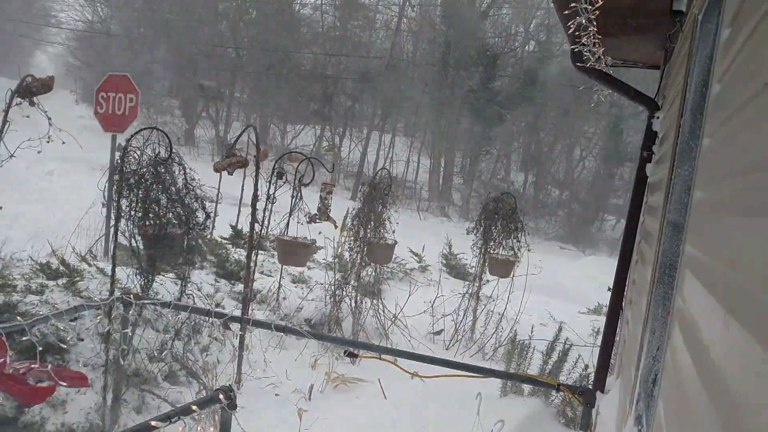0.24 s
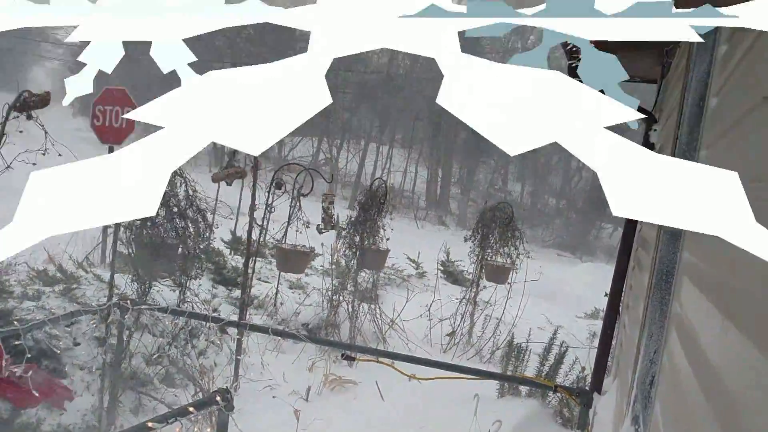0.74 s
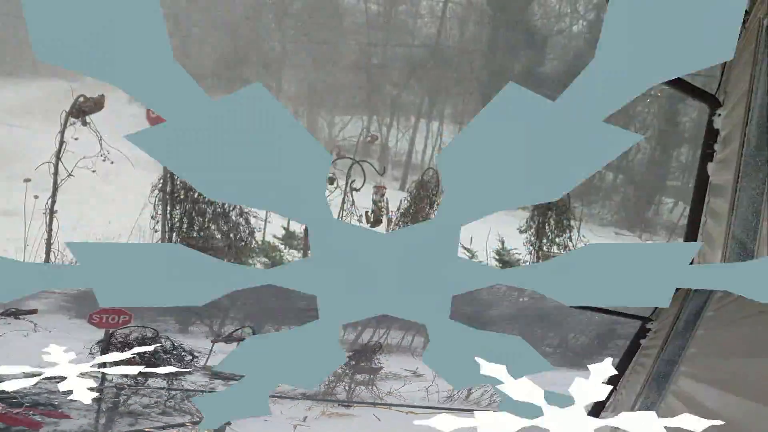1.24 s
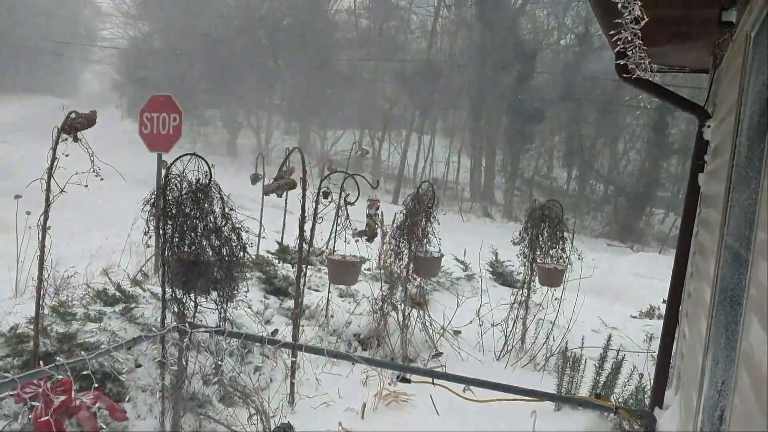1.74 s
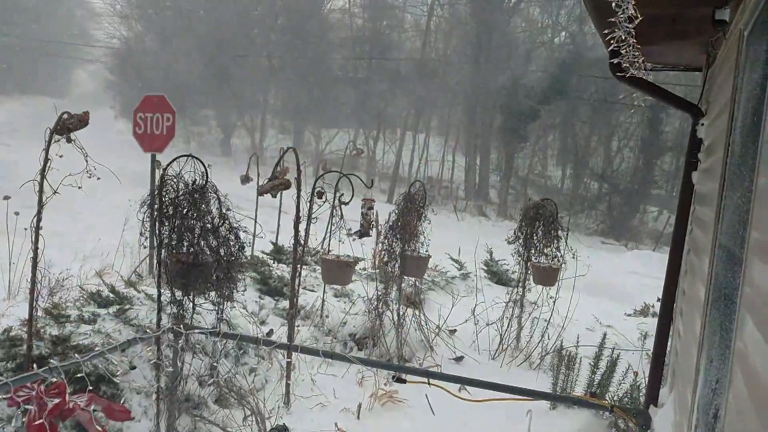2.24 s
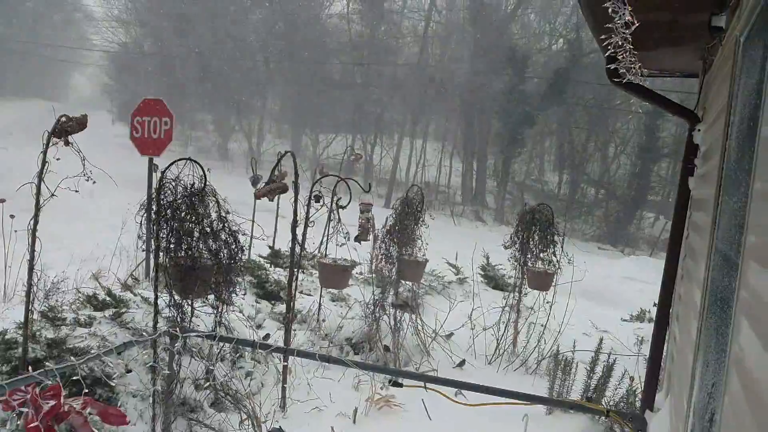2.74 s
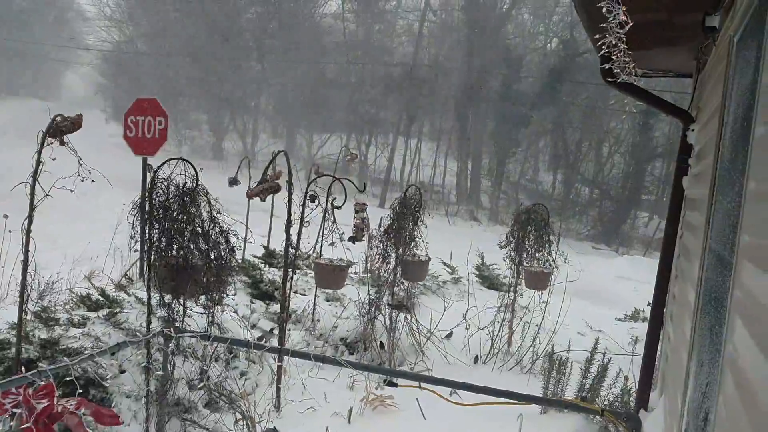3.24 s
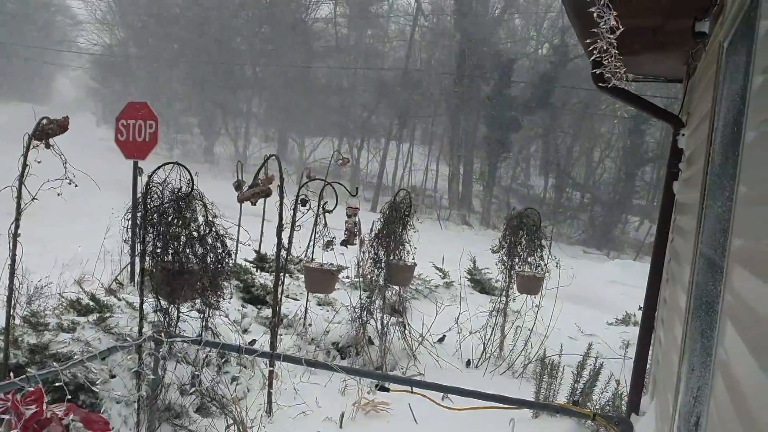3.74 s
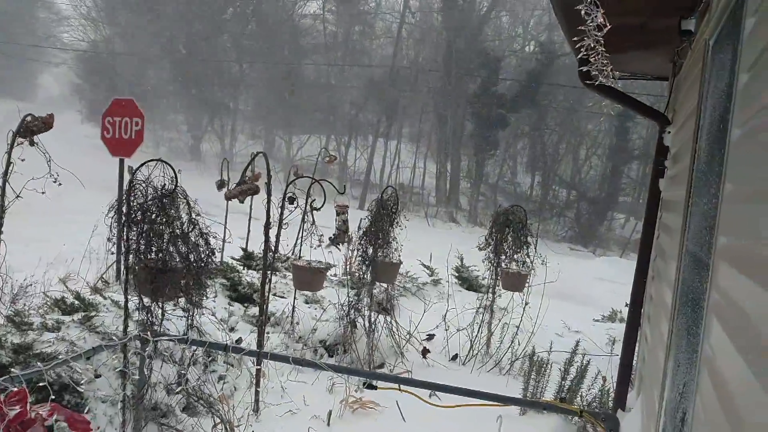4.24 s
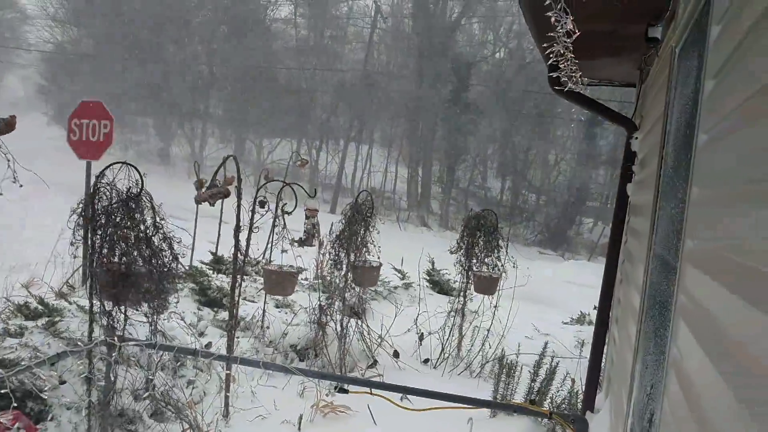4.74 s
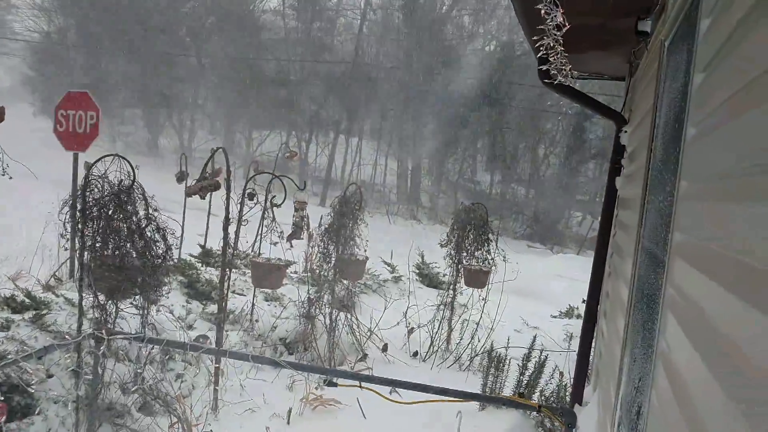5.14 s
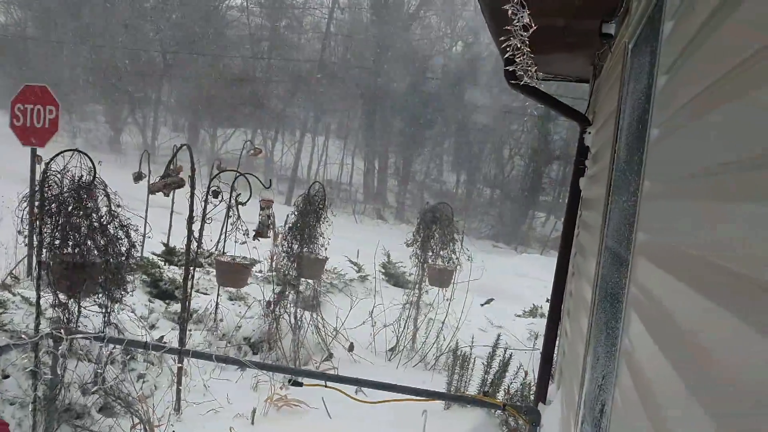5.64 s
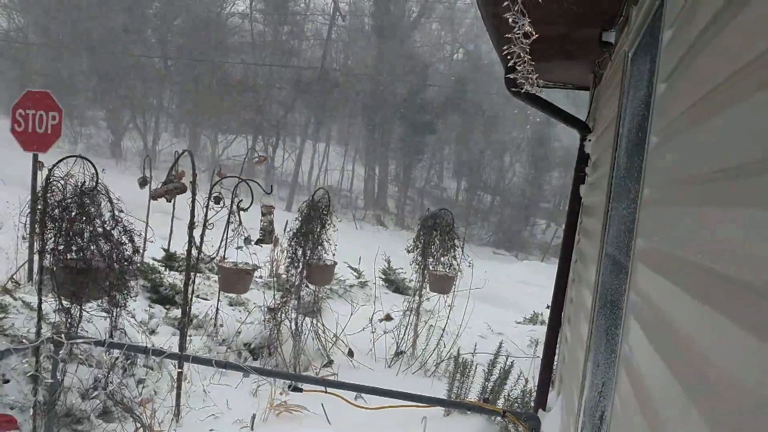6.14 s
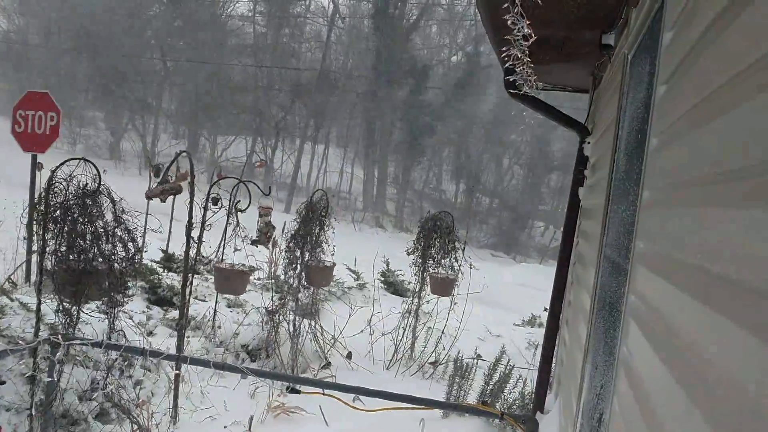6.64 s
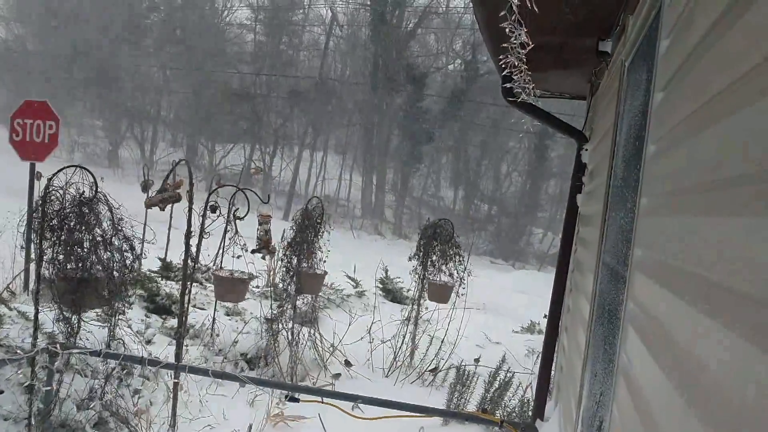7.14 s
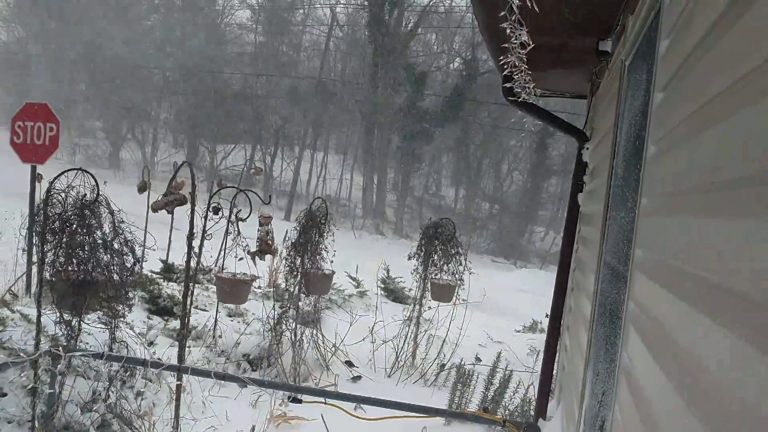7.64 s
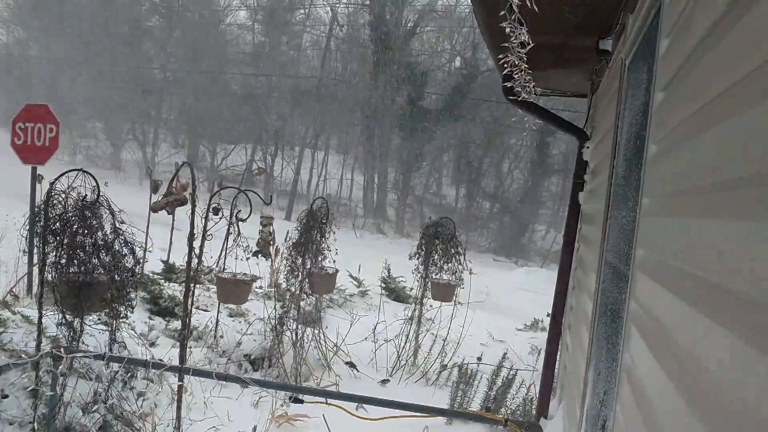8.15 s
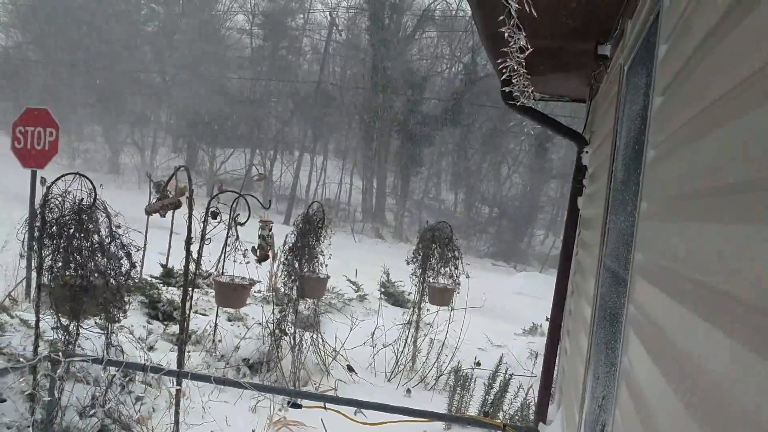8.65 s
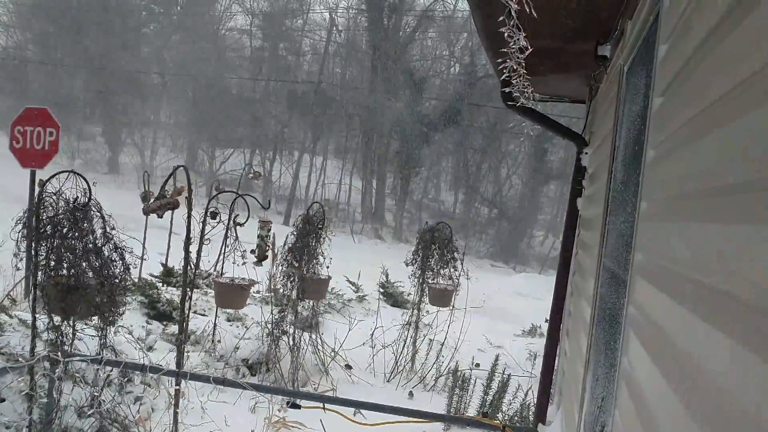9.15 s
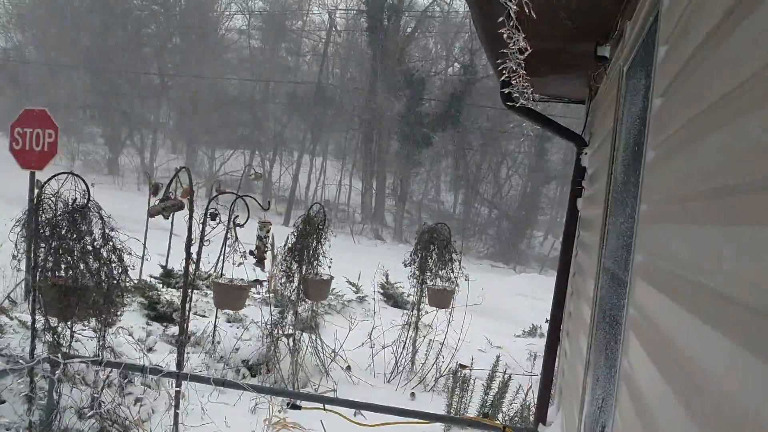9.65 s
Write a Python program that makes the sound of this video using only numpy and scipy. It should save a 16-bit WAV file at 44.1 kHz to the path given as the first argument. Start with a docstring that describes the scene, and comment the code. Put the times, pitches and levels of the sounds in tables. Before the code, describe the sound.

Door seal scrapes, latch rattles and a faint hinge squeak, then loud snowy wind roars outdoors, buffeting and overloading a small camera's microphones.

```python
"""Wind roars in bare trees as a door beside the microphone rubs, its latch clicks and its hinge squeaks.
It is a blizzard in a yard: filtered noise makes the roar and the hiss of blown snow, short pressure swings
make eddies thump on the two microphone ports of a small camera, and air at the left port sizzles and
whistles twice. Noise bursts ring the latch and door panel; shaped noise is the seal, tones are the hinge.
The camera widens its stereo by taking from each port a late copy of the other."""
import sys
import numpy as np
from scipy import signal
from scipy.fft import rfft, irfft, next_fast_len
from scipy.io import wavfile
from scipy.ndimage import uniform_filter1d, map_coordinates

SR = 44100
rng = np.random.default_rng(int(sys.argv[2]) if len(sys.argv) > 2 else 0)


def waveform_to_disk(signal):
    """Save audio, clipped to [-1, 1], as 16-bit WAV at the path in sys.argv[1]."""
    frames = np.transpose(np.atleast_2d(signal))
    scaled = np.clip(frames, -1, 1) * 32767
    samples = np.round(scaled).astype(np.int16)
    wavfile.write(sys.argv[1], SR, samples)


N = 437031
TIME = np.arange(N) / SR  # s


def amp(db):
    """Decibels to gain."""
    return 10 ** (np.asarray(db) / 20)


def unit(x):
    """Scale to rms 1."""
    return x / np.sqrt(np.mean(x ** 2) + 1e-20)


def along(points, hz):
    """Read (Hz, value) points on a log frequency axis."""
    f, v = np.transpose(points)
    return np.interp(np.log(hz + 1), np.log(f + 1), v)


def curve(points):
    """Join (s, value) points by straight lines, one value per sample."""
    s, v = np.transpose(points)
    return np.interp(TIME, s, v)


def wobble(rate):
    """A smooth random curve with this many knots a second, at most 190."""
    knots = rng.standard_normal(2000)
    return map_coordinates(knots, [TIME * min(rate, 190)])


def filtered(x, response):
    """Multiply the spectrum of x by a complex response of frequency."""
    m = next_fast_len(N + 8192)
    hz = np.fft.rfftfreq(m, 1 / SR)
    return irfft(rfft(x, m) * response(hz), m)[..., :N]


def patchy_noise(spread_db):
    """Two white noises under one field of random gain patches in time and frequency."""
    z = signal.stft(rng.standard_normal((2, N)), nperseg=512)[2]
    field = rng.standard_normal(z.shape[1:])
    for axis in (0, 1):
        field = uniform_filter1d(field, size=8, axis=axis)
    return signal.istft(z * amp(spread_db * unit(field)), nperseg=512)[1][:, :N]


def roar(level_db, lag_s=0.00026, pan_db=-2.5):
    """Wind in the trees: alike at both ports in the lows, earlier at the left, louder at the right."""
    # spectrum of the wind in bare branches: (frequency [Hz], level [dB per Hz])
    branches = [(25, -21), (60, -19), (110, -3.5), (185, 0), (260, 0), (360, -3.5), (520, -6), (700, -9),
                (840, -10), (1050, -15.5), (1200, -20), (1450, -26.5), (1850, -20), (2400, -30.5),
                (4000, -99)]
    # likeness of the roar at the two ports: (frequency [Hz], coherence [0-1])
    likeness = [(60, 0.99), (130, 1), (300, 1), (500, 0.94), (800, 0.8), (1200, 0.32), (1850, 0.89)]

    def mid_and_side(hz):
        angle = np.arccos(np.clip(along(likeness, hz), 0, 1)) / 2
        return amp(along(branches, hz)) * [np.cos(angle), np.sin(angle)]

    def arrival(hz):
        return np.exp(1j * np.pi * hz * lag_s * np.array([[1], [-1]]))

    mid, side = filtered(patchy_noise(spread_db=0.98), mid_and_side)
    pair = unit(filtered(np.array([mid + side, mid - side]), arrival))
    balance_db = np.array([[pan_db], [-pan_db]]) / 2
    return pair * amp(level_db + 0.5 + 0.54 * wobble(5.6) + balance_db)


def dips():
    """Sudden dips in the level of roar, hiss and sizzle in dB: each falls fast, creeps back, and adds to the
    others."""
    # the dips: (time [s], depth [dB] before the two exponentials shape it)
    drops = [(.3, 11), (.49, 6.5), (.64, 3.5), (0.809, 3), (1.21, 1), (1.4, 4), (4.777, 11.5), (6.459, 12),
             (6.56, 1), (6.7, 1), (6.93, 2.5), (7.22, 3)]
    fall_s, return_s = 0.0086, 0.6  # time constants
    start, depth_db = np.array(drops).T
    after = np.maximum(TIME - start[:, None], 0)
    return -depth_db @ (np.exp(-after / return_s) - np.exp(-after / fall_s))


def add_eddies(out, eddies, turns):
    """Add each eddy to one port as a short swing of pressure under a bell-shaped envelope."""
    t = np.arange(-900, 900) / SR
    phases = rng.uniform(0, 2 * np.pi, len(eddies))
    for (s, db, hz, port), phase in zip(eddies, phases):
        bell = np.exp(-.5 * (t * hz / turns) ** 2)
        swing = bell * np.cos(2 * np.pi * hz * t + phase)
        out[int(port > .5), round(s * SR) - 900:][:len(t)] += amp(db) * swing


def buffet(level_db):
    """Eddies on the ports: lumpy pressure noise, different at each, with single eddies as thumps."""
    # the hardest single eddies: (time [s], envelope peak [dB], pitch [Hz], port [0 left, 1 right])
    thumps = [(0.771, -10, 190, 1), (0.835, -7.9, 204, 1), (1.217, -0.1, 195, 1), (4.738, -0.7, 180, 1),
              (4.778, 0.6, 246, 1), (5.187, 1.5, 143, 1), (5.716, -5, 140, 1), (5.835, -2.1, 130, 1),
              (6.184, -0.8, 133, 1), (6.197, 0, 128, 0), (6.424, 0.2, 220, 1), (6.459, 1.6, 183, 1),
              (6.506, -2.6, 173, 0), (6.53, 1.1, 168, 1), (6.545, -6, 190, 1), (6.584, -1, 230, 0),
              (6.789, 0, 175, 1), (6.812, -4, 183, 1), (6.835, -0.7, 195, 1), (6.877, -2, 250, 1),
              (6.887, -5, 180, 1), (7.111, -3, 280, 1), (7.157, 0, 210, 1), (7.187, -5, 190, 1),
              (7.223, -1, 200, 1), (7.23, -3, 260, 0), (7.473, -0.5, 180, 0)]
    # sharp fronts of eddies on the right port: (time [s], envelope peak [dB])
    snaps = [(4.776, -6), (5.77, -4), (6.457, -7), (6.527, -5), (6.787, -8), (6.811, -6)]
    # spectrum of the turbulence: (frequency [Hz], level [dB per Hz])
    turbulence = [(20, -19), (35, -23), (60, 3.5), (90, -3.5), (130, 4.5), (180, -2), (250, -13), (350, -8),
                  (600, -17), (1200, -45), (4000, -120)]
    snap_hz = 630
    lumps = amp(6.4 * np.array([wobble(45), wobble(45)]) + 1.8 * wobble(9))
    pressure = lumps * rng.standard_normal((2, N))
    out = amp(level_db) * unit(filtered(pressure, lambda hz: amp(along(turbulence, hz))))
    add_eddies(out, thumps, turns=.45)
    add_eddies(out, [(s, db, snap_hz, 1) for s, db in snaps], turns=.33)

    # forty chance eddies, stronger where the buffeting is
    when, size, pitch, port = rng.uniform(.05, .95, (40, 4)).T
    peak_db = level_db[(when * N).astype(int)] + 12 * (.5 + size)
    chance_hz = 170 * (.5 + pitch) ** .5
    add_eddies(out, np.c_[when * N / SR, peak_db, chance_hz, port], turns=.45)
    return out


def hiss(level_db):
    """Blown snow all around: noise unrelated at the two ports, flickering in level."""
    # spectrum of the blown snow: (frequency [Hz], level [dB per Hz])
    snow = [(500, -22), (1100, 2.5), (1900, -0.5), (2700, 0.5), (3600, -1), (4100, -5.5), (5000, -5),
            (6500, -11.5), (8000, -16), (10000, -23), (12000, -29), (15000, -29)]
    pair = unit(filtered(patchy_noise(spread_db=1.0), lambda hz: amp(along(snow, hz))))
    return pair * amp(level_db + 0.66 * wobble(9) + 0.55 * wobble(35))


def puffs(buffet_db):
    """Handfuls of snow swish on both ports as bright noise, over thin spray that follows the eddies."""
    # handfuls blown against the camera: (time of peak [s], length [s], rms level at peak [dB])
    handfuls = [(4.105, 0.0099, -31), (4.31, 0.023, -31), (4.395, 0.034, -35), (4.458, 0.025, -32),
                (4.558, 0.029, -36), (4.65, 0.049, -36), (4.758, .02, -40), (6.424, 0.037, -42),
                (6.618, 0.015, -45), (6.924, .04, -39), (7.168, 0.033, -42), (8.125, 0.035, -36),
                (9.24, .06, -39)]
    spray_db = -35  # under the buffeting
    swell = np.zeros(N)
    for s, length, db in handfuls:
        swell += amp(db) * np.exp(-.5 * np.minimum(((TIME - s) / length * 2.5) ** 2, 99))

    def bright(hz):
        return (hz / 5000) ** 2 / (1 + (hz / 5000) ** 4.2)

    flakes = unit(filtered(rng.standard_normal((2, N)), bright))
    return (swell + amp(buffet_db + spray_db)) * flakes


def whistle(roar_db):
    """Air across the left port's edge: a noisy sizzle that locks into a wavering tone in two spells."""
    # each lock into a tone: (start [s], length [s], pitch when fully locked [Hz], rms when locked [dB])
    locks = [(4.48, .044, 7370, -35), (4.503, .031, 8150, -35), (4.515, .04, 7270, -34),
             (5.635, 0.092, 7160, -29.5), (5.699, 0.052, 7230, -31), (5.74, 0.035, 7500, -33)]
    # spectrum of the sizzle: (frequency [Hz], level [dB per Hz])
    sizzle = [(4500, -30), (6300, -14), (7200, 1), (7700, 4), (8400, 6), (9700, -7), (11000, -5),
              (15000, -20)]
    # swells of the sizzle: (time of peak [s], half width to 1/e [s], rise [dB])
    swells = [(4.45, 0.59, 4.5), (5.7, .07, 10), (6.16, 0.12, 12)]
    full_wind_db, growth = -43.5, 0.77  # the sizzle swings less than the roar
    lock_s = 0.014  # the tone swells and fades in this time
    sharpening, waver = 0.11, .01  # shares of the pitch: sharp while weak; slow waver
    level_db = full_wind_db + growth * (roar_db - roar_db.max())
    for s, width, db in swells:
        level_db = level_db + db * np.exp(-((TIME - s) / width) ** 2)
    noise = unit(filtered(rng.standard_normal(N), lambda hz: amp(along(sizzle, hz))))
    out = noise * amp(level_db + 1.2 * wobble(25))
    for s, length, hz, db in locks:
        lock = np.clip(np.minimum(TIME - s, s + length - TIME) / lock_s, 0, 1)
        bend = 1 + sharpening * (1 - lock) ** 2 + waver * wobble(50) + 0.0051 * wobble(180)
        tone = np.sin(2 * np.pi * np.cumsum(hz * bend) / SR)
        out += np.sqrt(2) * amp(db + 2.3 * wobble(150)) * lock ** 2 * tone
    return out * np.array([[1], [0]])


def latch():
    """Clicks and scrapes: bursts of force ring the latch, knock the door panel and add a bright edge."""
    # contacts: (time [s], force [dB], 60 dB decay [s], treble re force [dB], knock re force [dB])
    contacts = [(0.3494, -6.5, 0.0074, -5, -12), (0.3523, -22, .012, -12, 1),
                (0.3565, -25, 0.012, -20, 10.5), (0.3597, -26, 0.013, -20, 7), (0.3752, -27, 0.01, -15, 9),
                (.4315, -33, .005, -12, 0), (0.455, -34, 0.01, -6, 5), (0.4633, -40, 0.013, -20, 13),
                (0.478, -20, 0.006, 5, -14), (.53, -30, 0.012, -15, -5), (0.6007, -19, 0.008, 1, -3),
                (.6022, -19, .007, 2, 0), (0.6038, -29, .012, 16, -10), (0.6078, -29, 0.011, -2, -1),
                (.6193, -24, 0.011, 0, -2), (0.6232, -20, .008, -4, -12), (.6275, -19, 0.011, -4, 1),
                (0.6313, -23, .012, -2, 10), (0.6362, -27, 0.014, -2, 2.5), (.648, -30, .006, -8, 8),
                (.672, -36, .01, -10, 13), (.708, -40, .012, -12, 12), (.717, -45, .008, -12, 12),
                (1.181, -36, 0.003, 13, 7), (1.2059, -19.5, 0.0036, -2, 7),
                (1.209, -26.5, 0.0098, -12, 11.5), (1.213, -35, .005, -20, -9), (1.375, -35, 0.004, -4, 15),
                (1.3912, -39, 0.008, 10, 17)]
    # scrapes: (start [s], length [s], force [dB], treble re force [dB], knock re force [dB])
    scrapes = [(0.298, 0.055, -42, 19, -12), (0.362, 0.051, -42.5, -20, 12.5), (0.441, 0.019, -43, -20, 15),
               (0.48, 0.009, -22.5, 12, -15), (0.601, 0.041, -27, 12, 0)]
    # resonances of the latch: (frequency [Hz], width [Hz], relative level [dB])
    resonances = [(1230, 760, 5.5), (1990, 750, 10), (2650, 820, 7.5), (3180, 650, 6.5), (3610, 730, 0),
                  (6350, 1400, -11)]
    push = 6  # the sharp first push of a contact, over its rattle
    turn_s = 1.0  # the right port hears the latch late, much less so after this time
    t = np.arange(SR // 8) / SR
    grit = amp(22 * uniform_filter1d(rng.standard_normal(len(t)), size=36))  # friction comes in slips
    bursts = [(s, amp(db - 60 * t / t60), *rest) for s, db, t60, *rest in contacts]
    for s, length, db, *rest in scrapes:
        hold = np.clip(np.minimum(t / 0.0016, (length - t) / 0.011), 0, 1)
        bursts.append((s, grit * amp(db) * hold, *rest))

    ring, knock, bright = np.zeros(N), np.zeros(N), np.zeros((2, N))
    for s, shape, treble_db, knock_db in bursts:
        at = slice(round(s * SR), round(s * SR) + len(t))
        force = shape * rng.standard_normal((4, len(t)))
        force[:, 0] = push * shape[0]
        ring[at] += force[0]
        knock[at] += amp(knock_db) * force[1]
        bright[:, at] += amp(treble_db) * force[2:]

    def mode(f, hz, width):
        return 1j * f * width / (hz * hz - f * f + 1j * f * width)

    def metal(f):
        modes = sum((-1) ** k * amp(db) * mode(f, hz, width) for k, (hz, width, db) in enumerate(resonances))
        return modes / (1 + 1j * f / 7000)

    def panel(f):
        return mode(f, 770, 720) / (1 + 1j * f / 2500) ** 2

    def edge(f):
        return (1j * f / 4000 / (1 + 1j * f / 4000)) ** 2 / (1 + 1j * f / 9000) ** 3

    left = amp(10.5) * filtered(ring, metal) - amp(14.5) * filtered(knock, panel)
    late = np.where(TIME < turn_s, np.roll(left, shift=12), np.roll(left, shift=3))  # shifts in samples
    return np.array([left, amp(2.5) * late]) + filtered(bright, edge)


def seal():
    """The door seal rubs along the frame: a broad noisy rasp starts quickly, holds and dies away."""
    # rubs: (start [s], time from start to decay [s], rms level while held [dB])
    rubs = [(0.291, 0.088, -32), (0.344, 0.125, -37), (0.474, .02, -29), (.5, .1, -41), (0.6, 0.033, -27),
            (.64, .04, -39), (.7, .3, -44)]
    # spectrum of the rasp: (frequency [Hz], level [dB per Hz])
    rasp = [(400, -16), (1100, 8.5), (2200, 5.5), (3500, -1), (6000, -8.5), (10000, -18), (15000, -44)]
    rise_s, t60_s = .004, .17
    shape = np.zeros(N)
    for s, hold, db in rubs:
        decay_db = 60 * np.maximum(TIME - s - hold, 0) / t60_s
        shape += amp(db - decay_db) * np.clip((TIME - s) / rise_s, 0, 1)
    noise = unit(filtered(rng.standard_normal((2, N)), lambda hz: amp(along(rasp, hz))))
    return shape * amp(2.2 * wobble(150.2)) * noise


def hinge():
    """Soft groans and squeaks: slightly unsteady tones broken up by the slipping of the pin."""
    # one row a partial: (start [s], length [s], pitch [Hz], peak level before the slipping [dB])
    partials = [(.41, .068, 700, -26), (.43, .055, 157, -17), (.477, .005, 2720, -20),
                (.479, .014, 3070, -24), (.872, .06, 3460, -46), (.885, .05, 5250, -53),
                (.945, .11, 1980, -46), (.955, .1, 5780, -54), (2.0, .03, 5500, -40)]
    out = np.zeros((2, N))
    for s, length, hz, db in partials:
        u = np.arange(round(length * SR)) / SR
        drift = np.cumsum(rng.standard_normal(len(u))) * .06  # phase, radians
        swell = np.sin(np.pi * u / length) ** 0.7
        out[:, round(s * SR):][:, :len(u)] += amp(db) * swell * np.sin(2 * np.pi * hz * u + drift)
    return out * amp(2.5 * wobble(120))


def scene():
    """Sum wind, snow, eddies and door at the two ports."""
    # strength of the wind in the trees, before the dips: (time [s], roar level [dB])
    wind = [(0, -21), (.27, -21.5), (.47, -16), (1.0, -22.5), (1.7, -13.5), (2.2, -12.5), (2.75, -11),
            (3.6, -13.5), (3.97, -13), (4.44, -12.5), (4.55, -15), (5.0, -11.5), (5.35, -14.5),
            (5.75, -12.5), (6.2, -15), (6.45, -15), (7.6, -13), (8.0, -10.5), (8.5, -10.5), (8.72, -13.5),
            (8.95, -11.5), (9.36, -14), (9.58, -12.5), (9.91, -13.5)]
    # turbulence at the ports: (time [s], buffet rms level [dB])
    gusts = [(0, -40), (.3, -26), (.42, -46), (.53, -27), (.8, -25), (1.06, -38.5), (1.5, -26), (1.75, -70),
             (3.2, -37), (3.8, -39), (3.97, -13), (4.1, -28), (4.8, -20.5), (5.27, -19), (5.45, -35),
             (5.8, -19.5), (6.4, -21), (6.56, -12), (6.68, -22), (6.85, -18.5), (7.15, -15.5), (7.6, -25),
             (8.0, -26), (8.5, -63), (8.9, -49), (9.28, -13.5), (9.5, -36), (9.91, -18)]
    roar_db = curve(wind) + dips()
    buffet_db = curve(gusts)
    hiss_db = roar_db - 14.5  # blown snow lies under the roar and follows it
    air = roar(roar_db) + buffet(buffet_db) + hiss(hiss_db) + puffs(buffet_db) + whistle(roar_db)
    return air + latch() + seal() + hinge()


def record(dry):
    """Each channel loses a delayed share of the other port, overloads, and fades toward the band limit."""
    # stereo widening: (frequency [Hz], share of the other port taken away [0-1])
    crossfeed = [(100, 0.82), (300, 0.54), (1500, 0.56), (9000, 0.38), (11000, 0.75)]
    delay_s, top_hz = 17 / 44100, 15650

    def late_share(hz):
        return np.clip(along(crossfeed, hz), 0, .95) * np.exp(-2j * np.pi * hz * delay_s)

    def band_limit(hz):
        fade_db = np.interp(hz, [14600, 15250, 15450, 15600], [0.5, -9, -10, -30])
        return amp(fade_db) * (hz < top_hz)

    wide = dry - filtered(dry[::-1], late_share)
    overloaded = wide / (1 + np.abs(wide / 1.05) ** 5) ** (1 / 5)
    return np.clip(filtered(overloaded, band_limit), -1, 1)


dry = scene()
out = record(dry)
waveform_to_disk(out)
```